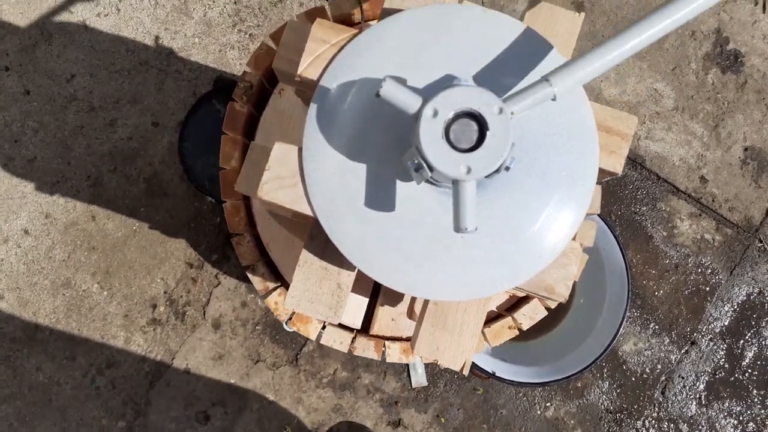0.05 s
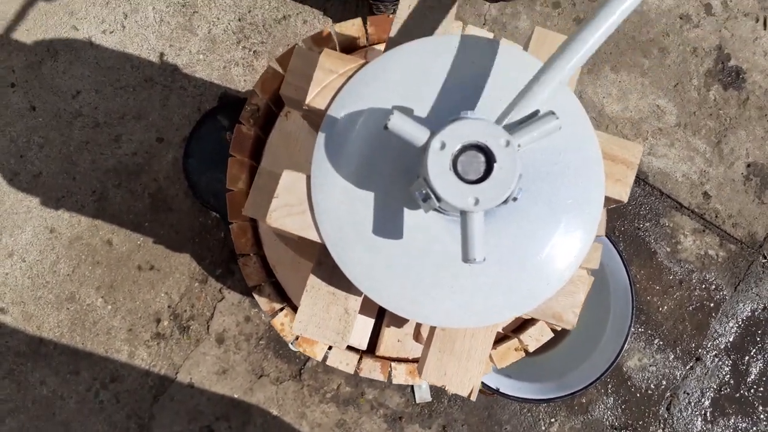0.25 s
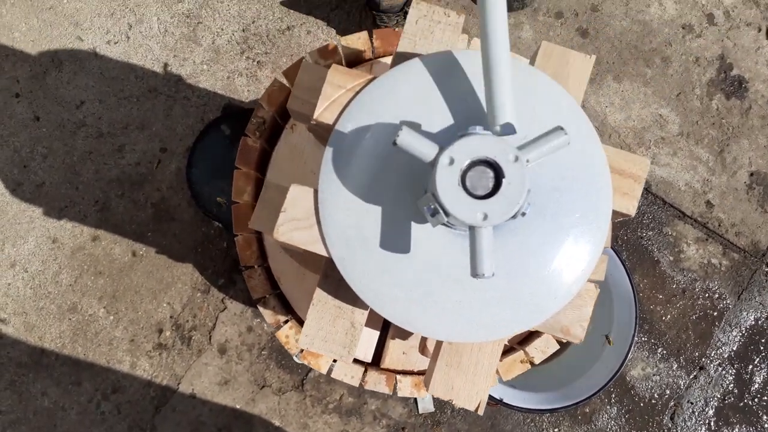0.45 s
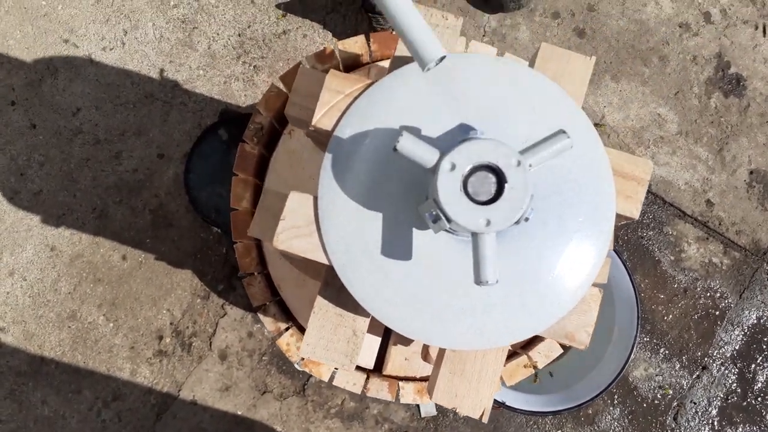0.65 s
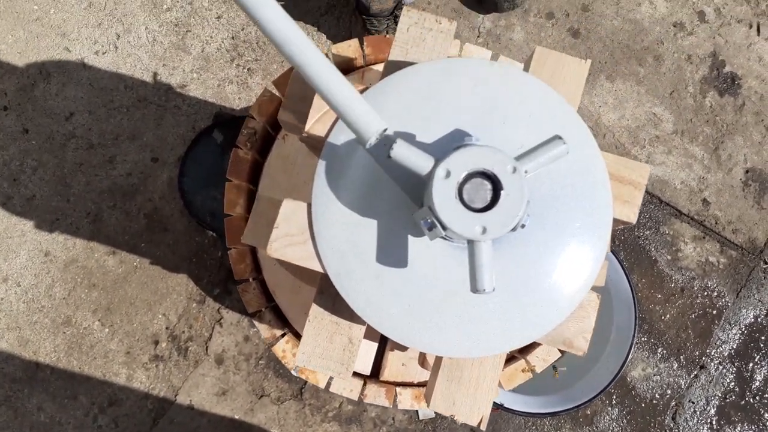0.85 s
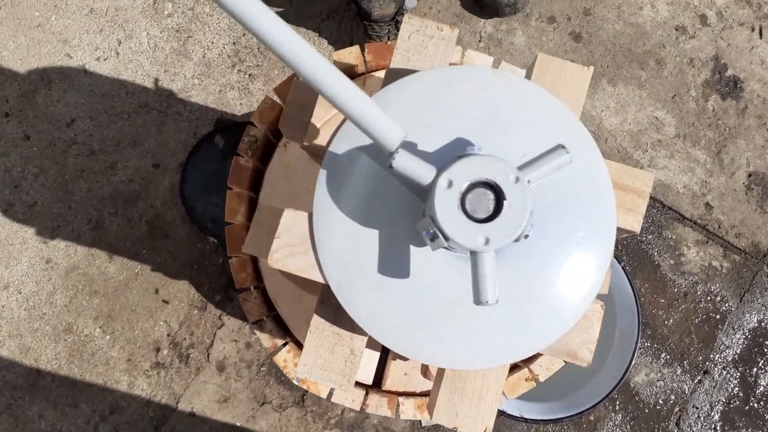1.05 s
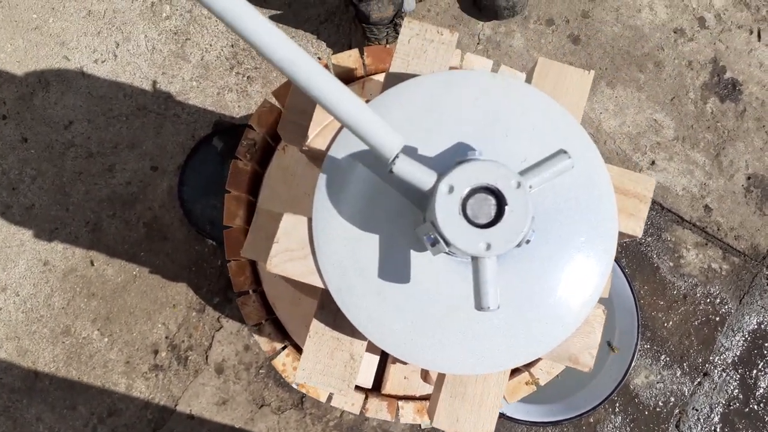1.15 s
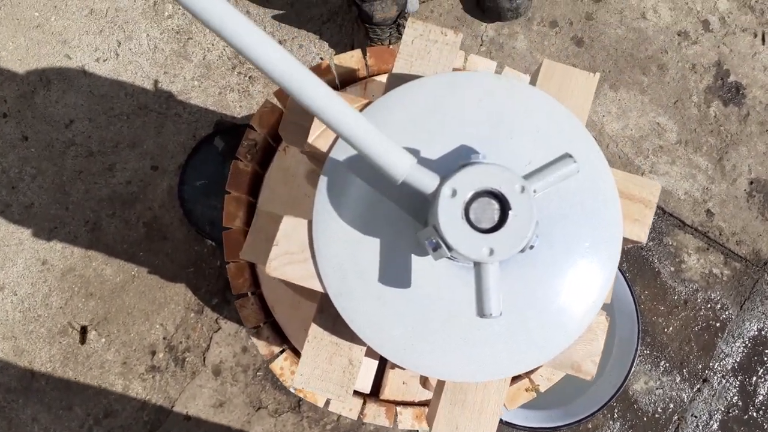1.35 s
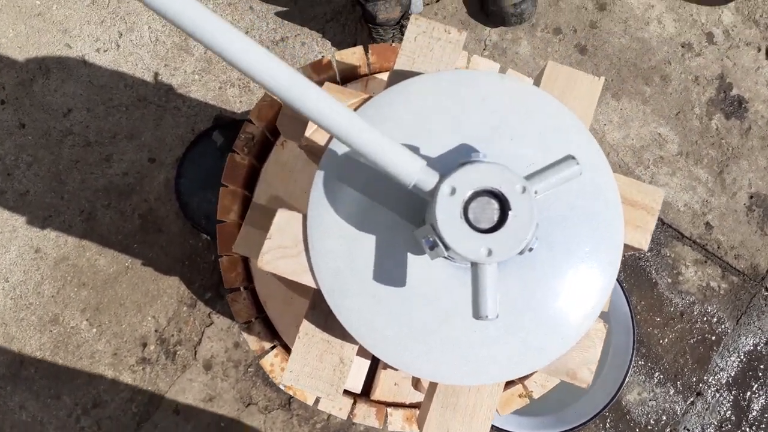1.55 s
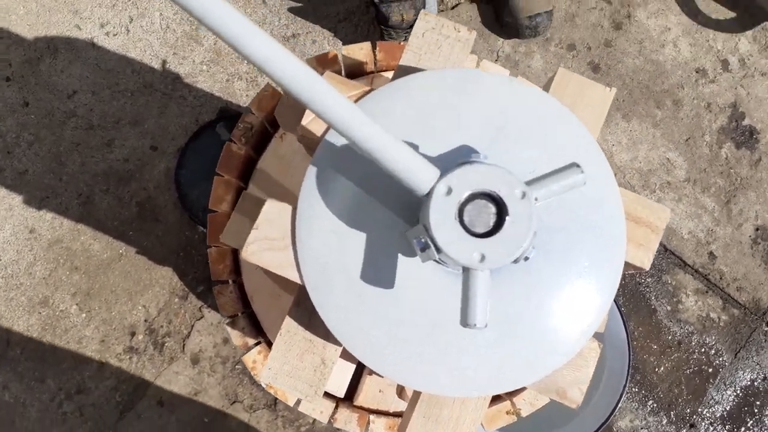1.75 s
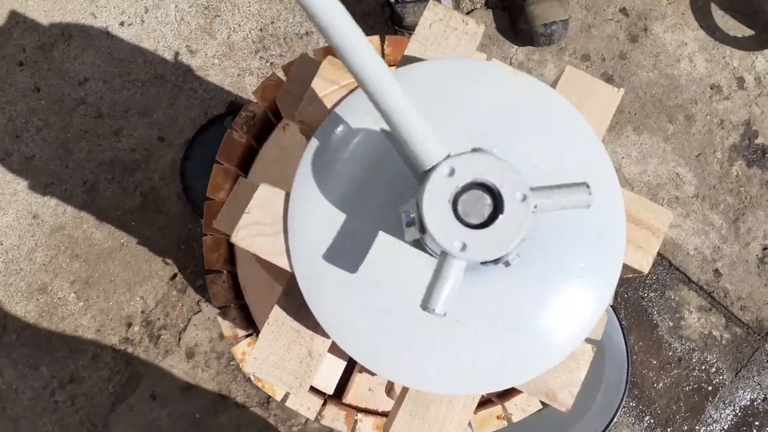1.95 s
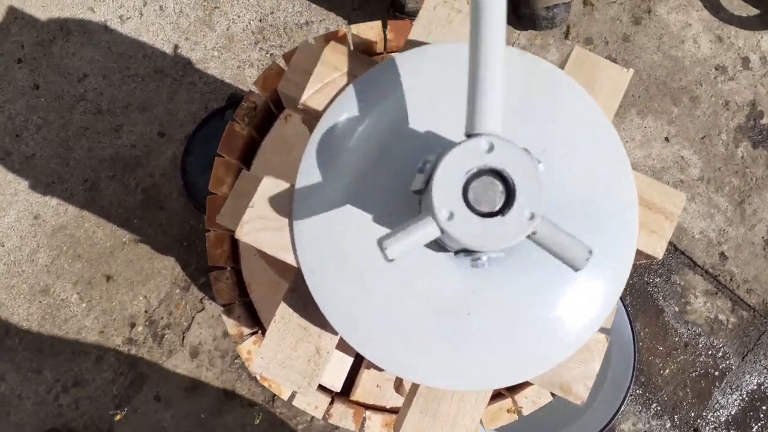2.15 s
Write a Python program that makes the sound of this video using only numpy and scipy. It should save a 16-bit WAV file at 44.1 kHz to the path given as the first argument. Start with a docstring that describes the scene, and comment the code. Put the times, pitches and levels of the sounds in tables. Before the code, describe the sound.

A steel pipe clanks on a grape press head in two sharp ringing bursts, then knocks duller as it is refitted; scraping and hollow wood knocks follow. Quiet outdoors, close microphone, mostly left.

```python
"""A faint steel scrape and a knock of wood come first; then a lever pipe on a grape press clanks and rings,
pulled off one stub of the head and shoved onto the next outdoors, rattling home against the plate.
It scrapes as the screw turns and the wooden blocks knock under load. Decaying sines make the ringing and
knocks; shaped noise makes the clacks, ticks, rubbing, wind and hiss; gliding sines make the squeaks.
The near, left microphone gets most of it; light wind touches both."""
import sys
import numpy as np
from scipy import signal
from scipy.fft import rfft, irfft, next_fast_len
from scipy.io import wavfile
from scipy.ndimage import map_coordinates

SR = 44100
rng = np.random.default_rng(int(sys.argv[2]) if len(sys.argv) > 2 else 0)


def wav_record(signal):
    """Record a signal, one row per channel, as 16-bit PCM in the file named by sys.argv[1]."""
    frames = np.transpose(np.atleast_2d(signal))
    bounded = np.clip(frames, -1, 1)
    # unit amplitude maps onto the largest positive 16-bit level
    quanta = np.round(bounded * 32767).astype(np.int16)
    wavfile.write(sys.argv[1], SR, quanta)


N = 97020  # samples, 2.2 s


def amp(db):
    """Amplitude ratio of a level in decibels: 20 dB is a factor of ten."""
    return 10 ** (np.asarray(db) / 20)


def unit(x):
    """Normalisation to a root-mean-square value of 1."""
    return x / np.sqrt(np.mean(x ** 2) + 1e-20)


def along(points, hz):
    """Interpolation of (Hz, value) points on a logarithmic frequency axis."""
    point_hz, values = np.transpose(points)
    return np.interp(np.log(hz + 1), np.log(point_hz + 1), values)


def curve(rows, axis=1):
    """Linear interpolation in time of one column of a table, one value per sample."""
    columns = np.transpose(rows)
    return np.interp(np.arange(N) / SR, columns[0], columns[axis])


def wobble(rate):
    """Smooth random fluctuation: a spline through Gaussian knots, rate knots a second."""
    knots = rng.standard_normal(N // 20)
    return map_coordinates(knots, [np.arange(N) * rate / SR], mode="wrap")


def filtered(x, response):
    """Linear filtering: the spectrum of x times a response of frequency."""
    m = next_fast_len(N + 8192)
    spectrum = rfft(x, m) * response(np.fft.rfftfreq(m, 1 / SR))
    return irfft(spectrum, m)[..., :N]


def noise(spectrum, colour=lambda hz: 1):
    """Coloured noise of rms 1: white noise shaped by (Hz, dB) points and an optional colour."""
    white = rng.standard_normal(N)
    return unit(filtered(white, lambda hz: amp(along(spectrum, hz)) * colour(hz)))


def since(s):
    """Elapsed time: seconds since s, zero before it."""
    return np.maximum(np.arange(N) / SR - s, 0)


def decay(t, t60):
    """Exponential damping: amplitude falls by 60 dB in t60 seconds."""
    return np.exp(-np.log(1000) * t / t60)


def fade(t, t60):
    """Impact envelope: exponential rise with a time constant of 0.72 ms, then exponential damping."""
    return (1 - np.exp(-t / 0.00072)) * decay(t, t60)


def tone(hz, t):
    """Simple harmonic motion: a sine of random phase."""
    return np.sin(2 * np.pi * (hz * t + rng.random()))


def port(wind_db, lumps_db=2.5, hiss_db=-71):
    """Turbulent pressure: low, lumpy noise of wind on one microphone's port, plus steady hiss."""
    # Spectrum of the wind noise. Each row: frequency in Hz, level in dB.
    buffet_spectrum = [(20, -33.5), (40, -11), (62, 0.5), (85, -6.5), (110, -10), (170, -11), (400, -32.5),
                       (1500, -81)]
    # Spectrum of the microphone hiss. Each row: frequency in Hz, level in dB.
    hiss_spectrum = [(100, 5), (3000, -2), (6000, -7.5), (8500, -19.5), (10000, -9.5), (12000, 2),
                     (15500, 1), (16000, -32.5)]
    wind = unit(noise(buffet_spectrum) * amp(lumps_db * wobble(21)))
    return amp(wind_db) * wind + amp(hiss_db) * noise(hiss_spectrum)


def air(level_db=-61.5):
    """Ambient sound as stationary coloured noise: the steady outdoor background."""
    # Spectrum of the background. Each row: frequency in Hz, level in dB.
    air_spectrum = [(30, -28.5), (150, 2.5), (220, -5.5), (295, 12), (380, -10), (700, -15.5), (2500, -9),
                    (5000, -21), (8000, -55.5)]
    return amp(level_db) * noise(air_spectrum)


def yard(x, t60=0.15):
    """Diffuse reverberation: convolution with decaying noise of unit energy, a short outdoor echo."""
    t = np.arange(SR // 2) / SR
    tail = rng.standard_normal(len(t)) * fade(t, t60)
    return signal.fftconvolve(x, tail / np.linalg.norm(tail))[:N]


def low_cut(x, cut_hz=205):
    """Inefficient bass radiation of small parts: a second-order high-pass."""
    return filtered(x, lambda hz: (1j * hz) ** 2 / (cut_hz ** 2 - hz ** 2 + 1j * hz * cut_hz))


def squeaks(waver=0.03):
    """Frequency modulation: short squeaks and low groans of screw and blocks, as unsteady gliding sines."""
    # Squeaks and groans. Each row: start in seconds, length in seconds,
    # start and end frequency in Hz before the random waver, peak level in dB.
    glide_rows = [(.035, 0.035, 5600, 6120, -60), (.766, 0.018, 2700, 2585, -48),
                  (.78, 0.086, 390, 263, -54), (1.012, 0.031, 5620, 6000, -64.5),
                  (1.735, 0.033, 625.6, 800, -43.5), (1.925, 0.047, 456, 583, -43),
                  (1.94, 0.0434, 2790, 2300, -52.5), (2.008, 0.072, 470, 595, -47.5),
                  (2.12, 0.0075, 2445, 2480, -43)]
    out = np.zeros(N)
    for s, length, start_hz, end_hz, db in glide_rows:
        progress = np.minimum(since(s) / length, 1)
        glide_hz = start_hz + (end_hz - start_hz) * progress
        hz = glide_hz * (1 + waver * wobble(400))
        swell = np.sin(np.pi * progress)
        out += amp(db) * swell * np.sin(2 * np.pi * np.cumsum(hz) / SR)
    return out


def scrape(rough_db=2.5, grit_rough_db=3):
    """Sliding friction: steel rubs on steel in many tiny dull catches, with a few gritty slips."""
    # Steel sliding and the screw turning. Each row: time in seconds, rms level in dB.
    rub_levels = [(0, -50), (.12, -51), (.4, -53.5), (.6, -55), (.7, -57), (.79, -52.5), (.88, -58),
                  (1.0, -59), (1.28, -55.5), (1.4, -50), (1.48, -54), (1.56, -53), (1.62, -50.5),
                  (1.65, -45.5), (1.69, -47.5), (1.8, -48), (1.89, -47.5), (1.98, -53), (2.05, -50),
                  (2.2, -49.5)]
    # Spectra of the rubbing, the catches and the grit. Each row: frequency in Hz, level in dB.
    rub_spectrum = [(100, -13.5), (300, -2), (550, 0), (900, -7), (1250, -5), (2100, -10.5), (2650, -8),
                    (3700, -18.5), (5500, -24), (8000, -46), (16000, -29)]
    catch_spectrum = [(150, -15.5), (400, -7.5), (600, 5.5), (900, 0), (1250, 2), (2000, -22), (2700, -10),
                      (4000, -26.5), (8000, -50.5)]
    grit_spectrum = [(500, -41), (1500, 10.5), (2200, -17), (3000, 2.5), (4500, -7.5), (6500, -27),
                     (9000, -36), (14000, -15.5)]
    # Gritty slips. Each row: centre in seconds, level in dB, half length (Gaussian sigma) in seconds.
    slip_rows = [(1.715, -46, .007), (1.899, -43.5, 0.009), (2.016, -52, 0.004), (2.156, -46, 0.0045)]
    catches_per_s, catch_db, catch_spread_db, catch_t60 = 130, -0.5, 4.3, 0.031

    struck = rng.random(N) < catches_per_s / SR
    catches = struck * amp(catch_db + catch_spread_db * rng.standard_normal(N))
    envelope = signal.fftconvolve(catches, fade(since(0), catch_t60))[:N]
    grains = envelope * noise(catch_spectrum)
    rough_rub = noise(rub_spectrum) * amp(rough_db * wobble(140))
    rub = amp(curve(rub_levels)) * unit(rough_rub + grains)

    slips = sum(amp(db) * np.exp(-.5 * ((since(0) - s) / half) ** 2) for s, db, half in slip_rows)
    grit = unit(noise(grit_spectrum) * amp(grit_rough_db * wobble(650)))
    return rub + slips * grit


def blocks(body_t60=0.041, tick_db=-8.5, tick_t60=0.051):
    """Damped resonance: each slip of the wood under load is a hollow knock with a dry noise tick."""
    # Knocks of the blocks. Each row: start in seconds, level in dB, pitch in Hz.
    knock_rows = [(.008, -34.5, 700), (.591, -44.5, 980), (.735, -39, 704), (.768, -31.5, 665),
                  (1.419, -34.5, 630), (1.461, -40.5, 698), (1.502, -37.5, 468), (1.539, -38.5, 582),
                  (1.581, -41, 750), (1.607, -35.5, 602), (1.672, -34.5, 494), (1.696, -29, 520),
                  (1.738, -31.5, 679), (1.753, -36, 687), (1.773, -36, 518), (1.82, -38.5, 530),
                  (1.87, -36.5, 652), (1.892, -30, 726), (1.9205, -29.5, 520), (1.94, -43, 463),
                  (1.954, -48, 538), (2.004, -30, 523), (2.022, -38.5, 536), (2.041, -39.5, 605),
                  (2.119, -46, 470)]
    # Spectrum of the tick. Each row: frequency in Hz, level in dB.
    tick_spectrum = [(150, -29.5), (450, 3.5), (1200, -5), (2000, -5), (2700, -6), (4000, -43), (8000, -50)]
    body = sum(amp(db) * fade(since(s), body_t60) * tone(hz, since(s)) for s, db, hz in knock_rows)
    ticks = sum(amp(db + tick_db) * fade(since(s), tick_t60) for s, db, hz in knock_rows)
    return body + ticks * noise(tick_spectrum)


def cracks(t60=0.011):
    """Impulsive contact: sharp steel edges meet in very short bursts of bright noise."""
    # Edge contacts. Each row: start in seconds, level in dB.
    crack_rows = [(.2148, -21.5), (0.4409, -34.5), (0.4724, -12)]
    # Spectrum of a crack. Each row: frequency in Hz, level in dB.
    crack_spectrum = [(2500, 0.5), (5000, 5.5), (7200, 0.5), (8500, -21.5), (12000, -10.5), (15500, -18)]
    envelope = sum(amp(db) * fade(since(s), t60) for s, db in crack_rows)
    return noise(crack_spectrum) * envelope


def burst(colour, envelope):
    """Dense modes heard as noise: a short clack with the energy of its envelope."""
    # Spectrum of the clack before the contact's colour. Each row: frequency in Hz, level in dB.
    clack_spectrum = [(100, -6.5), (300, -4.5), (700, 3.5), (900, -2.5), (1200, 3), (1750, -3), (2300, 7.5),
                      (2800, -5.5), (3300, 1.5), (3900, -16.5), (4700, -1), (6000, -24.5), (7300, -20.5),
                      (8500, -50.5), (16000, -26)]
    x = noise(clack_spectrum, colour)[:len(envelope)] * envelope
    return x * np.linalg.norm(envelope) / np.linalg.norm(x)


def contact_colour(hz, centre, spread, skirt_db=-18.5, skirt_reach=3.5):
    """Contact stiffness sets bandwidth: a bell around the centre and a weak skirt up to 3.5 times it."""
    skirt = amp(skirt_db) / (1 + (hz / (skirt_reach * centre)) ** 2)
    bell = np.exp(-.5 * (np.log2((hz + 1) / centre) / spread) ** 2)
    return skirt + bell


def clanks(snap_t60=0.013, mode_scatter_db=1.5, detune=0.003):
    """Modal excitation: contacts snap, clack and ring the plate; hard ones are centred high, soft low."""
    # Modes of the head and its plate. Each row: nominal frequency in Hz, mean level in dB,
    # t60 in seconds before the contact's decay factor.
    plate_modes = [(470, -8.5, 0.11), (591.4, -5, .11), (716, -5.5, 0.062), (1065, -9, 0.074),
                   (1170, 0.5, 0.079), (1222, -1.5, 0.082), (1287, -8.5, 0.12), (1570, -2, 0.092),
                   (1607, -7.5, 0.17), (1802, -10, .1), (1892, -2, 0.084), (2184, -11, 0.06),
                   (2360, -10, .1), (2457, -8.5, 0.037), (3356, -13, 0.071)]
    # Pipe against head. Each row: start in seconds, plate level in dB, plate decay factor, clack level
    # in dB, centre in Hz, spread in octaves, clack t60 in seconds, snap level in dB over the clack.
    contact_rows = [(0.2147, -23.5, .9, -16.5, 2300, 0.94, 0.083, 11.5),
                    (.260, -23, 1.5, -20.5, 2170, .62, .045, 14.5),
                    (.283, -24.5, 0.53, -29, 743, 0.31, 0.12, -5),
                    (.292, -25.5, 0.77, -25.5, 1212, 1.23, 0.033, -18.5),
                    (0.312, -34, 1, -38, 1480, 1.1, .05, -12.5),
                    (.321, -39.5, 1.2, -39, 1685, 1.2, 0.064, -15),
                    (.356, -32.5, 0.58, -30.5, 1700, 0.57, 0.02, -2.5),
                    (0.4206, -34, 0.8, -44, 1380, 1, 0.028, 8.5),
                    (.442, -16, 1.2, -12.5, 4290, 0.45, 0.062, -9),
                    (.450, -19.5, 1.35, -27, 1900, 1.03, 0.0544, -20),
                    (.4705, -14.5, 0.51, -25.5, 1160, 0.46, .05, -12),
                    (.482, -22, 0.7, -38, 1200, 1, .05, -10),
                    (.494, -62, 0.52, -30.5, 1516, 1.2, 0.065, -6),
                    (0.936, -32, 0.82, -30.5, 610, 1, 0.033, -18),
                    (0.9388, -21, 0.48, -21.5, 1001, 0.93, 0.041, -11),
                    (1.141, -43, 0.55, -37, 790, 0.42, 0.028, -3),
                    (1.318, -36.5, 0.63, -40, 1210, 0.52, 0.028, -18),
                    (1.349, -47.5, 2.7, -41.5, 1500, 0.56, 0.029, 5.5),
                    (1.383, -31.5, 0.35, -48, 1020, 0.42, 0.015, -15),
                    (1.696, -28.5, 0.72, -36.5, 985, 0.53, 0.017, 2)]
    out, t = np.zeros(N + SR), np.arange(SR // 4) / SR
    for s, plate_db, decay_factor, clack_db, centre, spread, t60, snap_db in contact_rows:
        colour = lambda hz: contact_colour(hz, centre, spread)
        ring = np.zeros(len(t))
        for hz, db, mode_t60 in plate_modes:
            level = amp(db + rng.normal(0, mode_scatter_db)) * colour(hz)
            mode = tone(hz * rng.normal(1, detune), t)
            ring += level * fade(t, mode_t60 * decay_factor) * mode
        clack = burst(colour, fade(t, t60) + amp(snap_db) * fade(t, snap_t60))
        out[round(s * SR):][:len(t)] += amp(plate_db) * ring + amp(clack_db) * clack
    return out[:N] + cracks()


def pipe(damped_t60=0.086, waver_rad=0.13, waver_db=1):
    """Bar modes under contact damping: blows renew the ring, free until the pipe leans on the stub."""
    # Partials of the pipe. Each row: frequency in Hz, level in dB, free t60 in seconds.
    partials = [(3073, 0, .45), (4908, -7, .13), (7088, -23, .17), (9500, -41, .11), (12108, -25, .07),
                (15675, -35, .15)]
    # Blows that ring it. Each row: start in seconds, level in dB, free ringing before damping in seconds,
    # brightness in dB per octave, extra dB on the highest partial.
    blow_rows = [(0.2145, -14.5, 0.039, -2.5, -12), (.260, -16, 0.031, -0.5, -9),
                 (.321, -39.5, 0.03, -6.5, -9), (.356, -40, .008, -10.5, -10),
                 (0.4198, -47, 0.007, -12.5, -16), (.442, -10, 0.0022, -1.5, -2),
                 (0.4696, -29.5, 0.025, 8.5, 5), (.521, -49, 0.033, 2, -2.5),
                 (1.317, -48.5, .005, -22.5, -10), (1.351, -41.5, 0.0034, -26, -6)]
    lowest_hz, highest_hz = partials[0][0], partials[-1][0]
    blows = []
    for s, db, free, bright, top_db in blow_rows:
        held = amp(db) * decay(since(s + free), damped_t60)
        blows.append((since(s), held, bright, top_db))

    out = np.zeros(N)
    for hz, db, t60 in partials:
        ratio = hz / lowest_hz
        levels = []
        for t, held, bright, top_db in blows:
            tilt_db = bright * np.log2(ratio) + top_db * (hz == highest_hz)
            levels.append(held * fade(t, t60) * amp(tilt_db))
        level = np.max(levels, axis=0)  # the strongest blow prevails
        flicker = amp(db + waver_db * wobble(110))
        phase_waver = waver_rad * ratio * wobble(140)  # high partials waver more
        out += level * flicker * np.sin(2 * np.pi * hz * since(0) + phase_waver)
    return out


def shaded(x):
    """Acoustic shadow: level and phase lag that depend on frequency, on the way to the right microphone."""
    # Level at the right microphone. Each row: frequency in Hz, level in dB.
    shade_levels = [(60, -7), (150, -8.5), (450, -10.5), (740, -15.5), (1220, -25.5), (2000, -26.5),
                    (3100, -23.5), (4000, -25), (4900, -13.5), (7000, -25), (9000, -17), (15000, -9)]
    # Phase lag at the right microphone. Each row: frequency in Hz, lag in radians.
    shade_phase = [(100, 1), (2150, 0.57), (3100, -2.5), (4820, 3), (7900, 6), (15000, 7)]
    return filtered(x, lambda hz: amp(along(shade_levels, hz)) * np.exp(-1j * along(shade_phase, hz)))


def scene(near_echo_db=-15.5, far_echo_db=-14, scatter_db=-7.5):
    """Direct and scattered fields: the left microphone hears the press directly, the right is shaded."""
    # Wind on the ports. Each row: time in seconds, left rms level in dB, right rms level in dB.
    wind_levels = [(0, -56, -53), (.03, -45.5, -61), (.075, -67, -48), (.13, -65, -67.5), (.26, -55, -56),
                   (.305, -45.5, -49.5), (.335, -40.5, -53.5), (.39, -71, -60), (.55, -71.5, -75.5),
                   (1.0, -79, -74.5), (1.6, -70.5, -76.5), (1.8, -68.5, -57.5), (1.9, -70, -65.5),
                   (2.02, -66.5, -56), (2.2, -54.5, -64)]
    press = low_cut(pipe() + clanks() + blocks() + scrape() + squeaks()) + air()
    # sound by other paths: fresh draws make it incoherent with the direct sound
    scattered = amp(scatter_db) * low_cut(clanks() + scrape()) + amp(far_echo_db) * yard(press)
    near = press + amp(near_echo_db) * yard(press)
    far = shaded(press + scattered)
    left = near + port(curve(wind_levels, axis=1))
    right = far + port(curve(wind_levels, axis=2))
    return np.array([left, right])


def record(dry):
    """Saturation and band limiting: clipping at full scale, then nothing from 16600 Hz up."""
    return filtered(np.clip(dry, -1, 1), lambda hz: hz < 16600)


dry = scene()
out = record(dry)
wav_record(out)
```